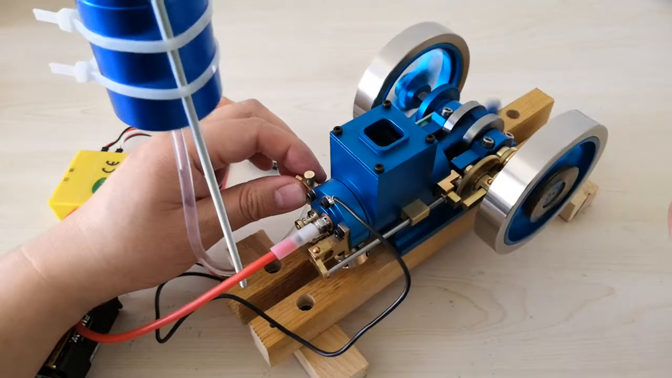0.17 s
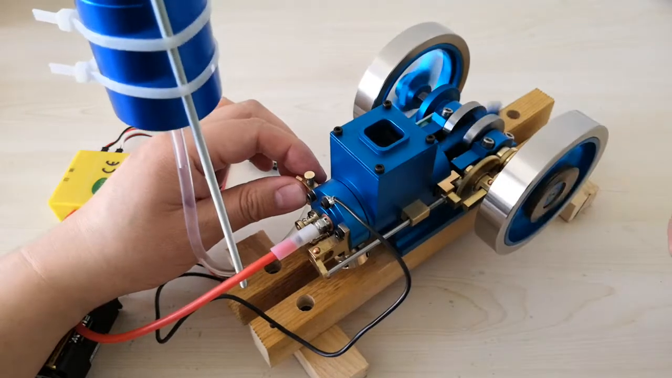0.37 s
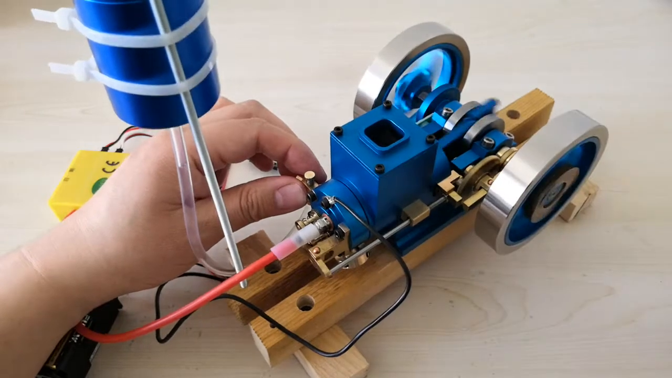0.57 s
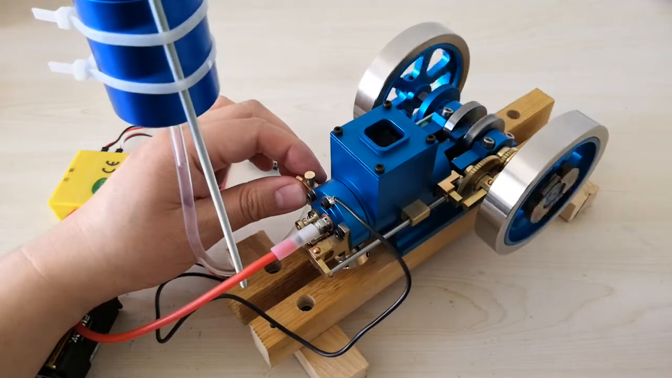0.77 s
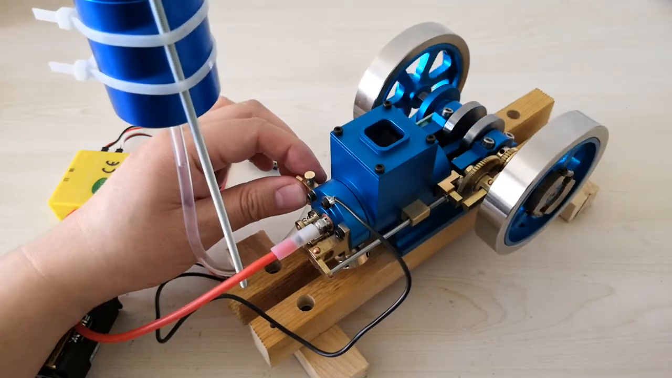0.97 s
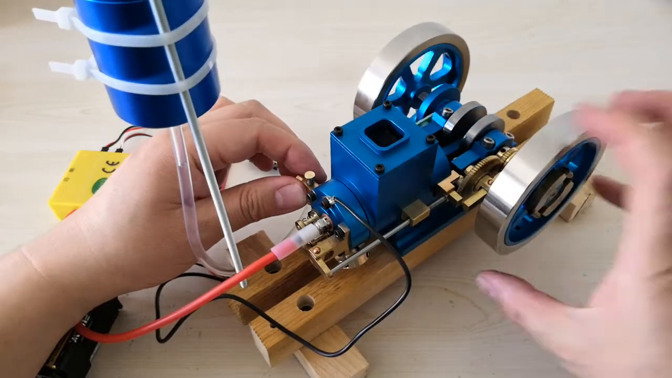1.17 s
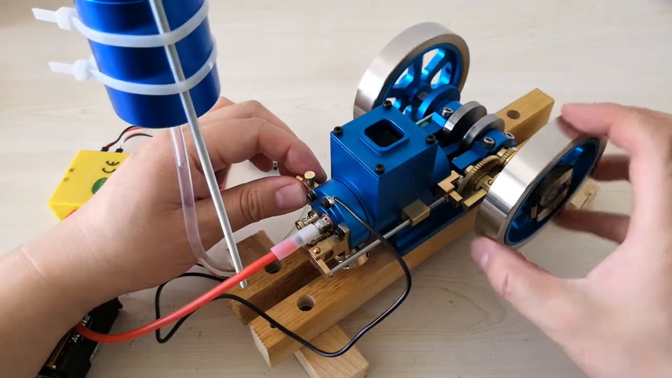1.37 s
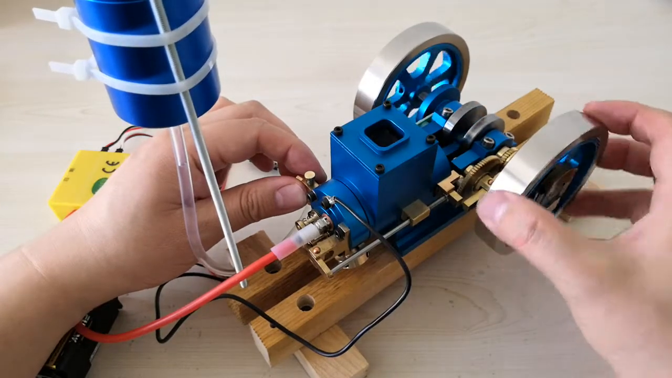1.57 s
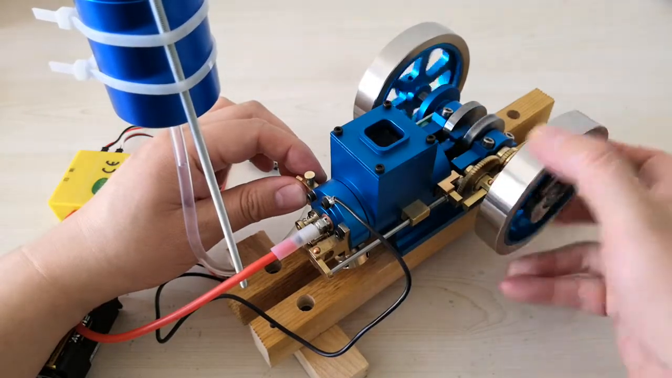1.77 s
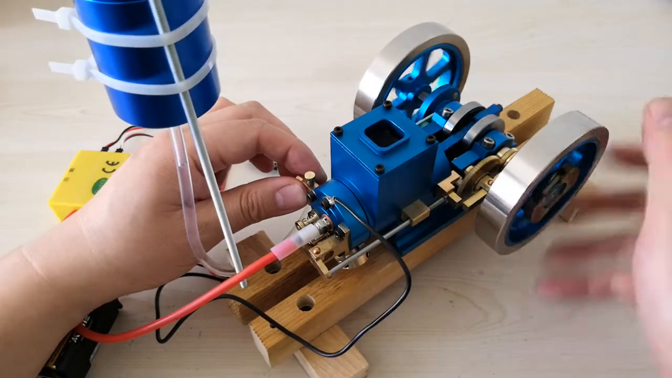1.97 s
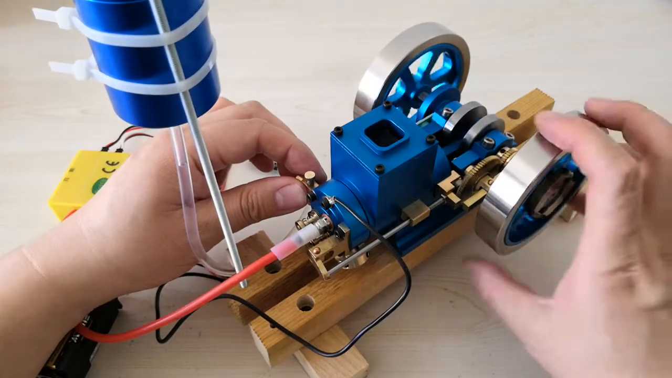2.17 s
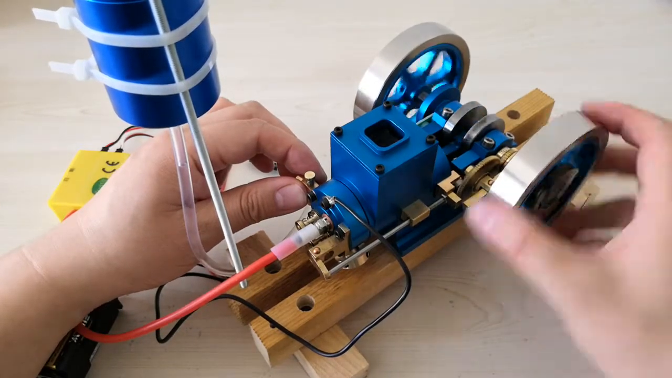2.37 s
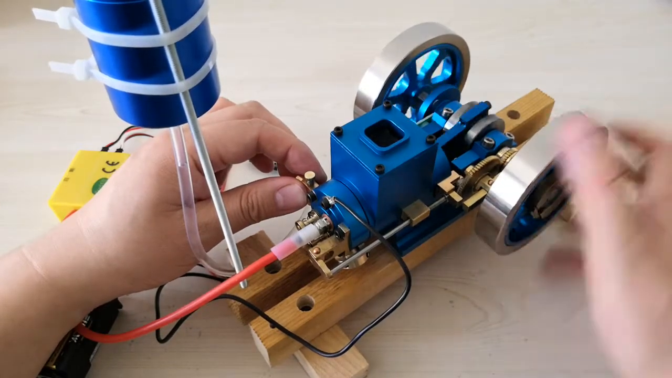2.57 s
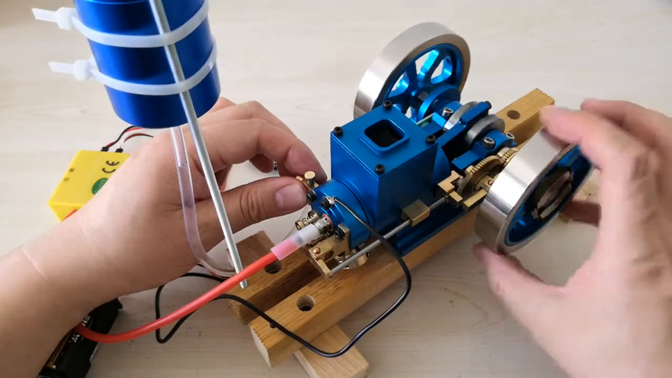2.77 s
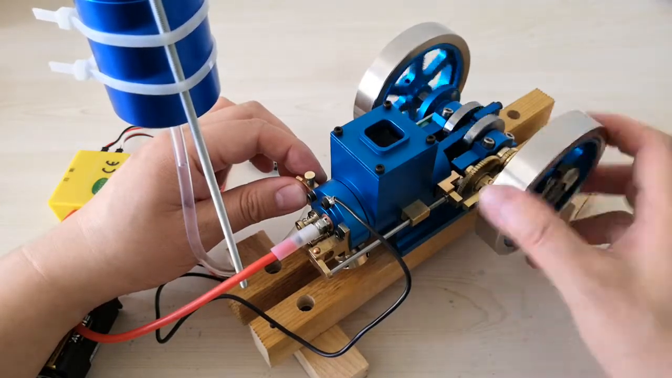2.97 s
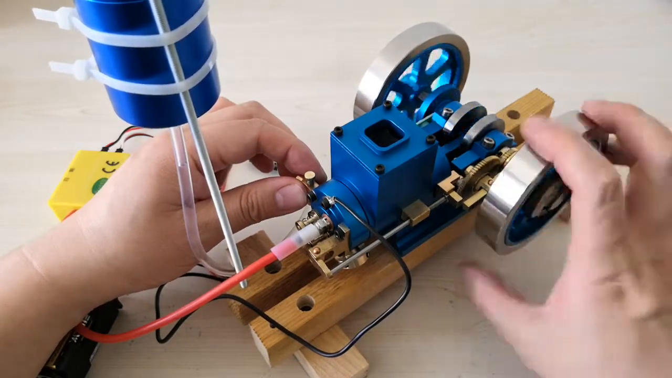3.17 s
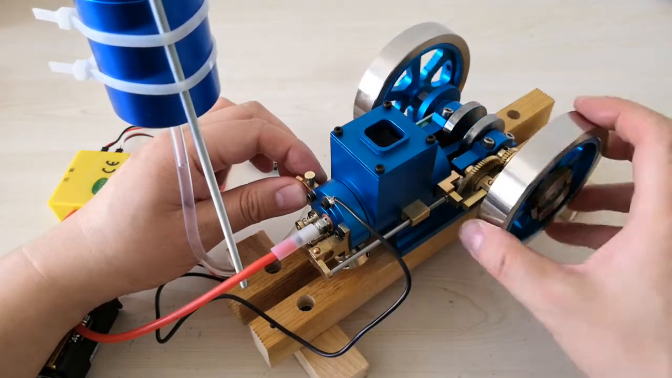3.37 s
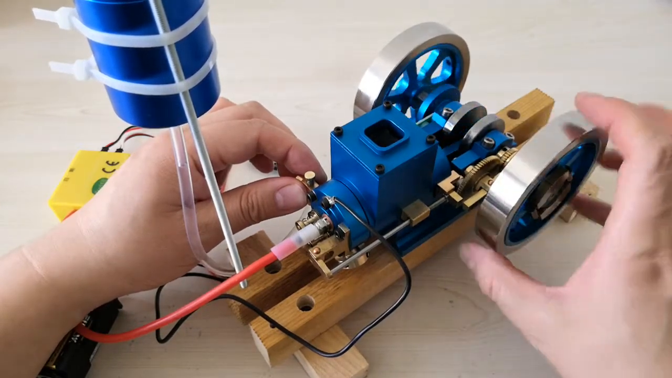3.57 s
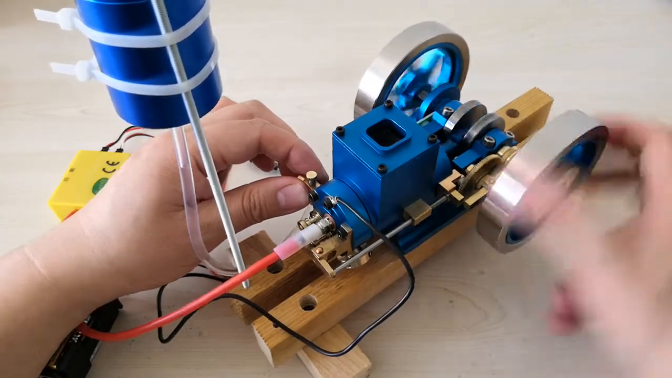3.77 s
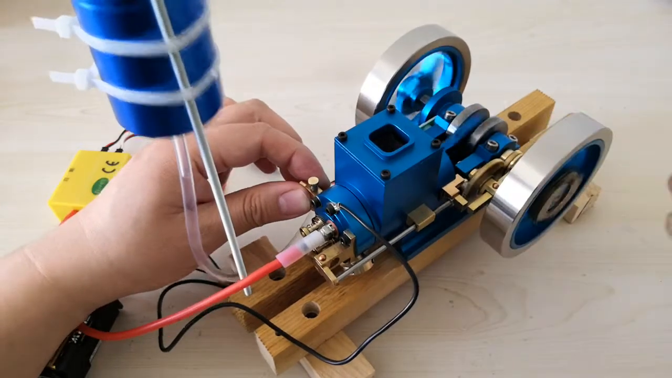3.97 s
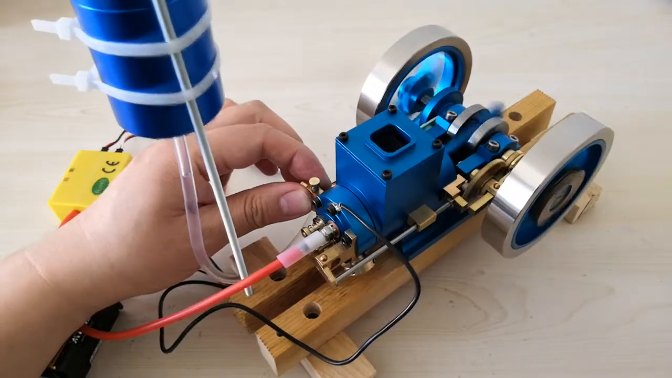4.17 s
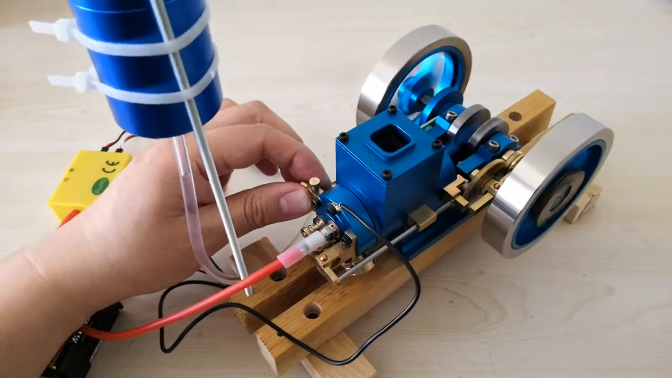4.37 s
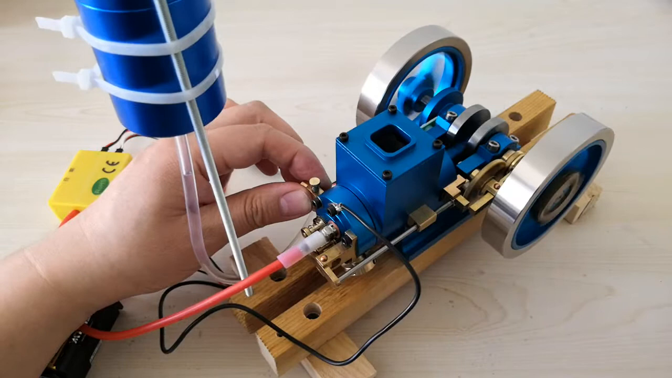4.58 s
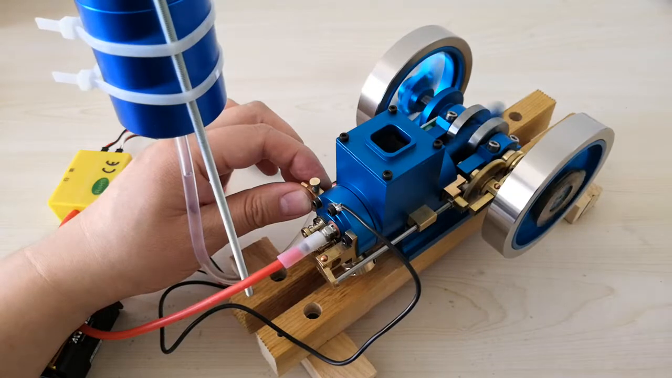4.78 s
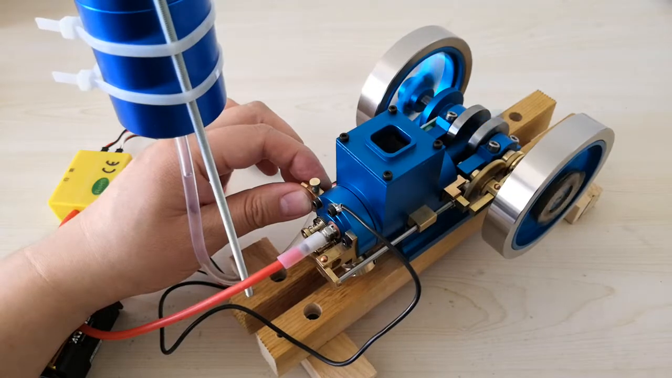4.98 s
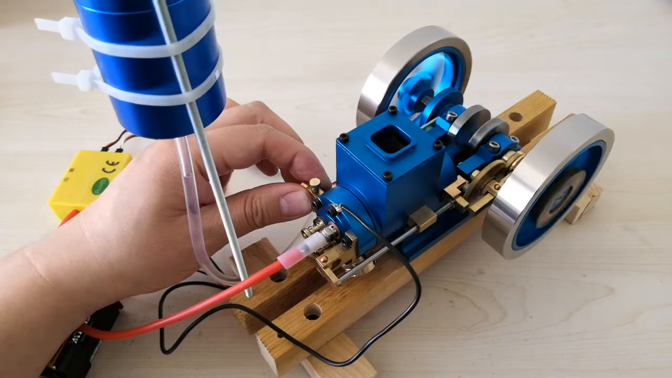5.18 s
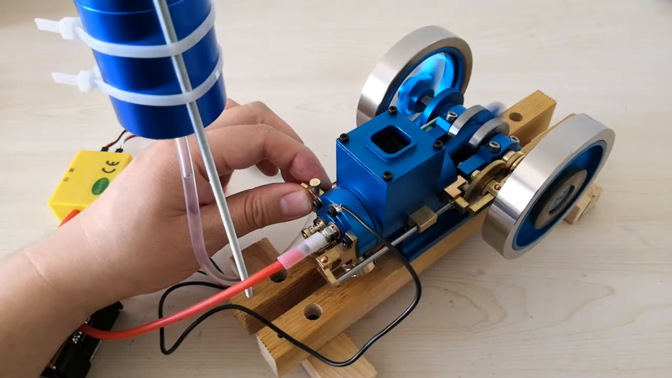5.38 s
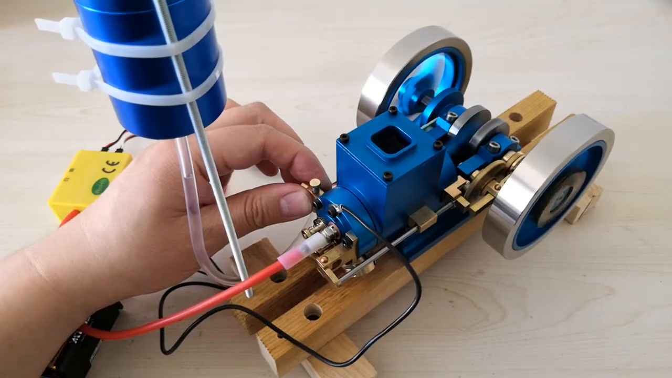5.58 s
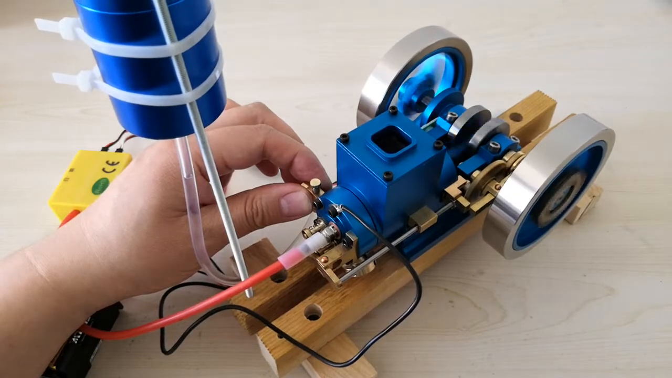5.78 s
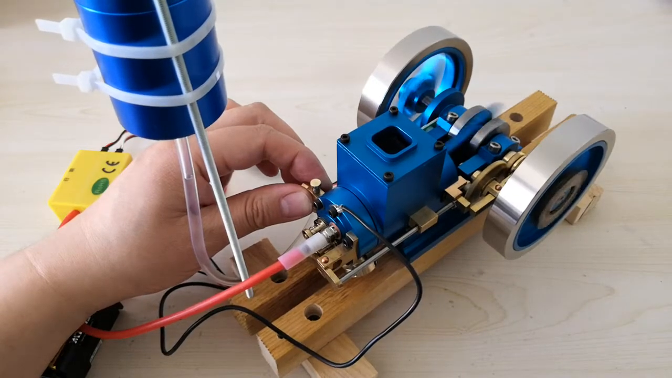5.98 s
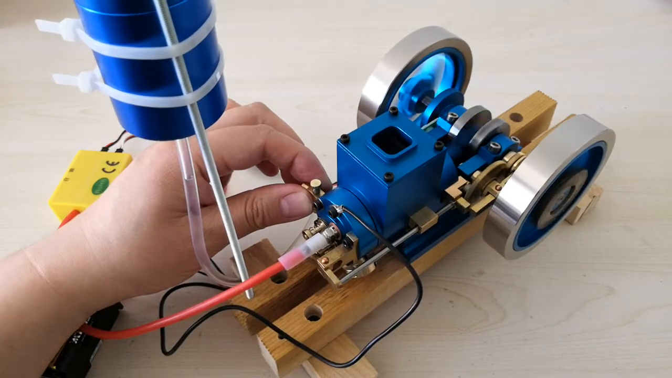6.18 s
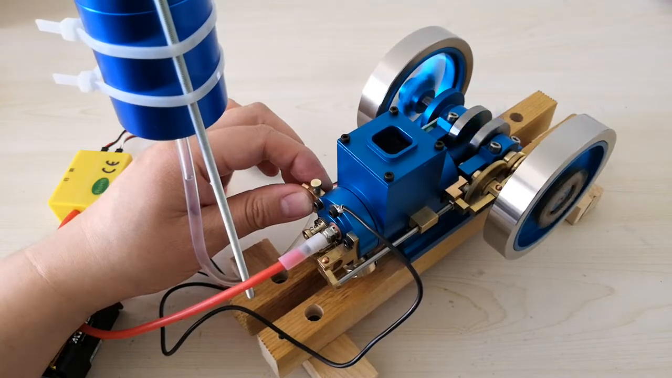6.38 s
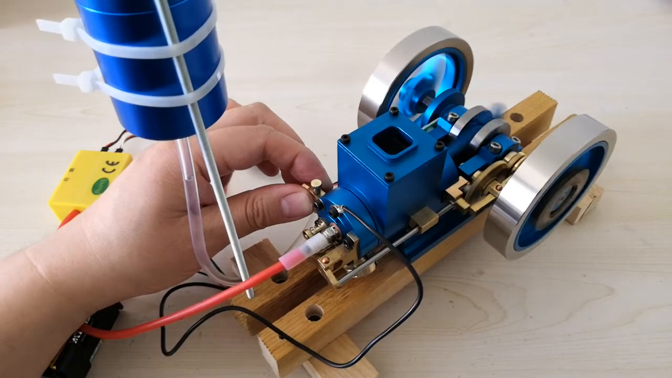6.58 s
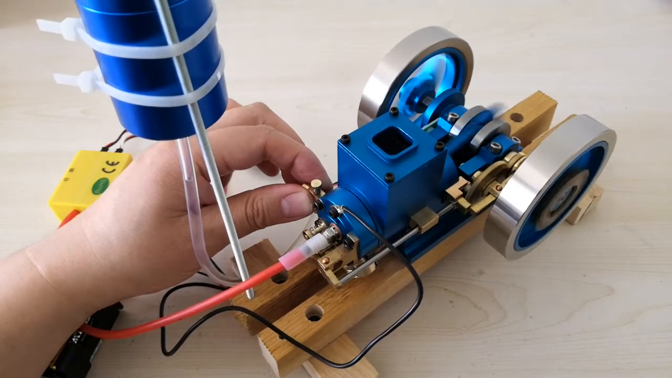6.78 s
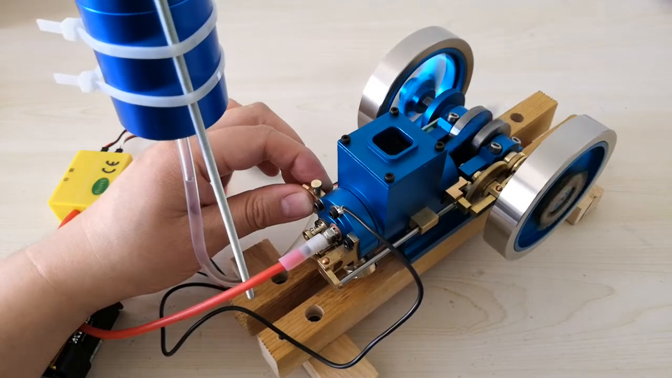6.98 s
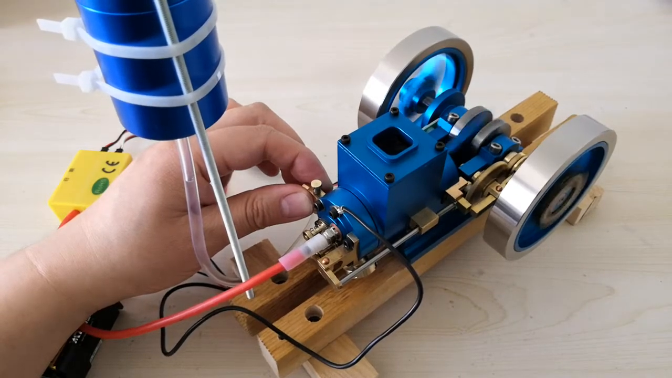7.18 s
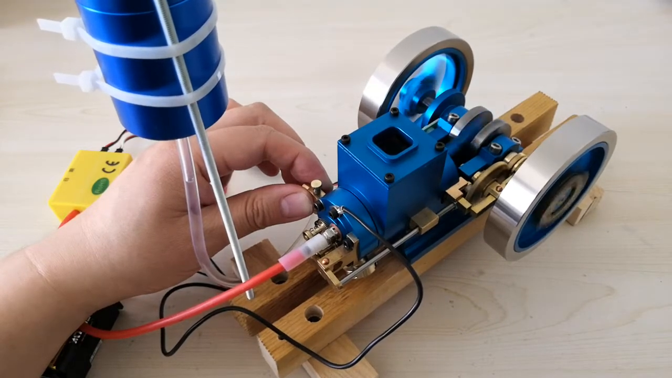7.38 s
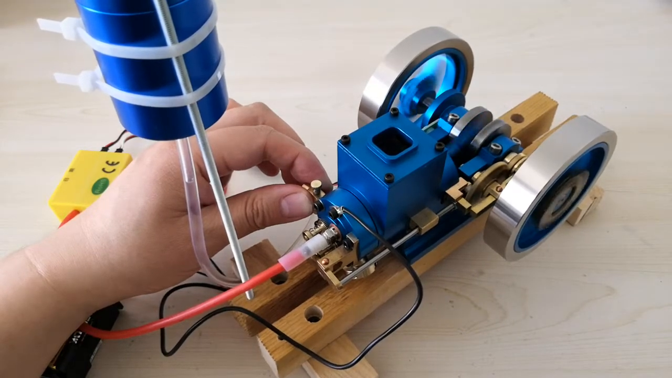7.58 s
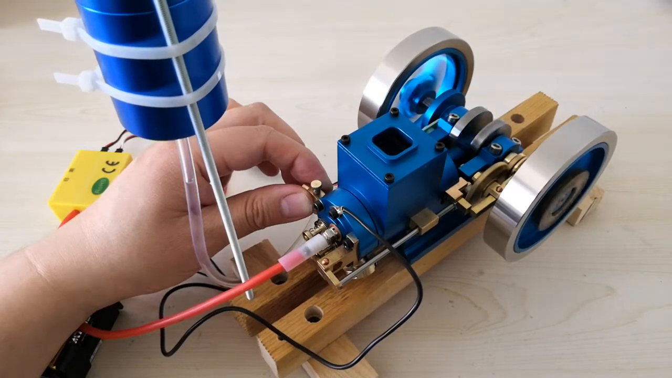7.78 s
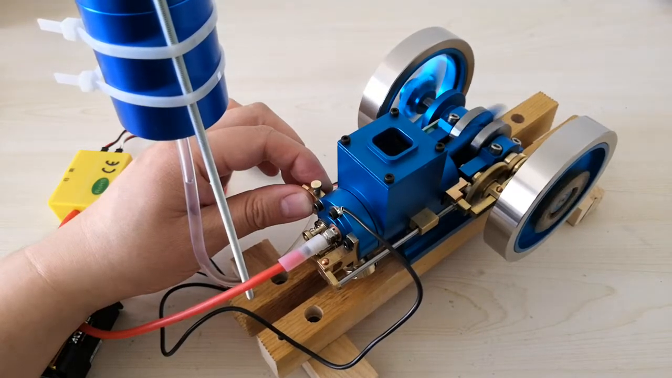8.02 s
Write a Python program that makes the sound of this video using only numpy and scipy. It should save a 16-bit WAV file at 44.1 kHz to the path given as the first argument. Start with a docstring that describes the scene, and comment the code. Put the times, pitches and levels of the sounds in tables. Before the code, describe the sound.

Hard steel knocks and gear chatter coast down within about a second, leaving faint finger bumps, small clicks and brief ratcheting turns in near silence. Then another flick, a thud of the base, and regular hissing spits with double knocks that accelerate over table rumble. Finally fast, dry pops take over, strongest on the right. Close stereo microphone, small bare room with slight ring.

```python
"""Model gas engine on a table

A small engine on a wooden table, close to a stereo microphone in a bare room. A flick gives a few
knocking turns that die out; it is turned by hand, flicked again and gathers speed. Each running cycle is
an exhaust spit (noise burst) and two knocks (frame modes) over whirring gears (tooth impulses in steel).
At last the spits harden to pops, gas slugs that overload the microphone input.
"""
import sys
import numpy as np
from scipy import signal
from scipy.fft import rfft, irfft, next_fast_len
from scipy.io import wavfile
from scipy.ndimage import uniform_filter1d, map_coordinates

SR = 44100
rng = np.random.default_rng(int(sys.argv[2]) if len(sys.argv) > 2 else 0)


def put_to_file(sound):
    """Save the sound as 16-bit audio at rate SR, in the file named by the first command-line argument."""
    columns = np.atleast_2d(sound).T  # one column per channel
    safe = np.clip(columns, -1, 1)
    whole_steps = np.round(safe * 32767)
    wavfile.write(sys.argv[1], SR, whole_steps.astype(np.int16))


N = 355005

# Table levels are relative: the layer gains come on top.
# crank knocks as the wheel is flicked or turned by hand:
# t/s, level/dB, length/s, time span over which softer knocks follow/s (0 = none follow)
CRANK_KNOCKS = [(0.081, -1.5, 0.0021, 0.2), (0.126, -6.5, 0.0018, 0), (0.1405, -13, 0.0034, 0.0017),
                (0.2718, -7, 0.0026, 0.19), (0.47, -7.5, 0.0021, 0.19), (0.6762, -8.5, 0.0019, 0.24),
                (0.686, -22, 0.0019, 0.00049), (0.9395, -19, 0.0027, 0.0068), (1.933, -15.5, 0.0058, 0),
                (1.94, -23, .004, 0.011), (3.934, -7, 0.0021, 0.17), (3.969, -16, 0.0038, 0)]
# softer knocks within such a span: share of span, level/dB, length/s
REBOUND_KNOCKS = [(0.31, -20.5, 0.0053), (0.543, -18.5, 0.0026)]
# frame modes rung by a knock: f/Hz, level/dB
FRAME_MODES = [(1500, -4), (1810, 8), (2200, -1.5), (2680, -6)]
# frame mode that sings on: f/Hz, width/Hz, level/dB
SINGING_MODE = [(1860, 7.5, -7)]
# dry steel contact spectrum: f/Hz, density/dB per Hz
STEEL_SPECTRUM = [(200, -12.5), (800, -2.5), (1100, -5.5), (1800, 6.5), (3700, -2), (4400, -9.5),
                  (5300, -2.5), (6300, -13.5), (7300, -7), (13000, -38)]
# exhaust rate from the first running stroke on: t/s, f/Hz (cycles)
CYCLE_RATE = [(4.115, 5.868), (4.3, 6.064), (5.05, 8.11), (5.45, 8.946), (5.7, 9.061)]
# strong exhaust strokes: t/s, bark/dB, hollow middle/dB, low thump/dB
POP_STROKES = [(6.3759, -12.5, -10.5, -16), (6.4813, -17, -16, -26), (6.5871, -16, -15.5, -20.5),
               (6.6916, -15, -12, -23), (6.7953, -11.5, -11.5, -9.5), (6.8998, -21, -38, -23.5),
               (7.004, -12, -7, -10.5), (7.1082, -16, -4.5, -16), (7.2101, -16.5, -7, -11.5),
               (7.3117, -11.5, -4, -13.5), (7.4141, -13, -12, -11), (7.5154, -12, -3.5, -9),
               (7.6159, -13, -44, -24), (7.7184, -13.5, -13.5, -13), (7.822, -12, -34, -25),
               (7.9269, -12.5, -14.5, -14), (8.0307, -16, -16, -29)]
# exhaust spectra, hiss and bark: f/Hz, density/dB per Hz
SPIT_SPECTRUM = [(1000, -93), (2400, 16.5), (4500, 10.5), (7500, 7), (12000, 0), (15500, -13)]
BARK_SPECTRUM = [(150, 7.5), (1000, -12.5), (1700, 13), (2500, 8.5), (7000, -7.5), (15000, -78)]
# hollow middle of a pop: f/Hz, density/dB per Hz
HOLLOW_SPECTRUM = [(450, -9.5), (1050, 14), (2200, -23)]
# wheel coasting after the first flick: t/s, table rumble/dB, gear whirr/dB
COAST_LEVELS = [(0.0, -49.5, -64.5), (0.07, -34, -28.5), (0.14, -29.5, -28), (0.25, -28, -28.5),
                (0.8, -32, -29), (0.91, -33, -40.5), (0.99, -28, -39), (1.12, -38.5, -50), (1.22, -51, -75)]
# last flick and the run: t/s, table rumble/dB, gear whirr/dB
RUN_LEVELS = [(3.851, -46, -54.5), (3.89, -36, -33.5), (3.99, -31, -23), (4.08, -29, -27),
              (5.2, -30.5, -27.5), (6.33, -40.5, -30), (6.42, -44, -33.5), (7.0, -39.5, -35),
              (8.041, -43, -35)]
# small turns by hand: t/s, hold/s, table rumble/dB, gear whirr/dB
HAND_TURNS = [(1.374, 0.057, -40, -55), (1.939, 0.094, -37, -37.5), (2.158, 0.028, -38, -54.5),
              (2.473, 0.078, -48, -44.5), (2.555, 0.032, -35, -36.5), (2.895, 0.095, -45, -55),
              (3.227, 0.084, -41.5, -76), (3.646, 0.014, -36, -45.5)]
# gear whirr spectrum: f/Hz, density/dB per Hz
WHIRR_SPECTRUM = [(200, -54), (400, -8), (620, -11.5), (800, -4), (1400, -4.5), (1850, 2.5), (2100, -8),
                  (2900, -1.5), (3700, -15.5), (6000, -14.5), (12000, -68.5)]
# resonances rung by the gear teeth: f/Hz, width/Hz, level/dB
GEAR_RESONANCES = [(2184, 110, -2.5), (3698, 120, -6)]
# piston and intake hiss: t/s, level against the whirr/dB
SLIDE_LEVELS = [(.85, 0.5), (1.1, -5), (2.3, -3), (2.55, 3), (2.9, -5), (4.1, -2.5), (5.2, 7.5), (7.5, 8)]
# piston and intake spectrum: f/Hz, density/dB per Hz
SLIDE_SPECTRUM = [(2500, -36), (4300, -2.5), (6100, -7.5), (7400, 0.5), (8500, -4.5), (10500, -10.5),
                  (15000, -21)]
# cam follower taps: share of cycle or span, level against the whirr/dB
CAM_TAPS = [(0.222, 4), (.69, 4)]
# scraping or ticking valve-gear links: f/Hz, density/dB per Hz
ROD_SPECTRUM = [(1500, -27), (2500, 5), (3600, 7.5), (5500, -5), (8000, -9), (15000, -56.5)]
# valve rod and catch clicks: t/s, level/dB, length/s
VALVE_CLICKS = [(0.644, -25, 0.0037), (0.839, -12, 0.0071), (1.363, -36, 0.015), (1.44, -25, 0.0033),
                (1.78, -50, 0.0092), (1.892, -42.5, 0.012), (1.931, -21, 0.01), (2.388, -44.5, .005),
                (2.469, -23, 0.0057), (2.562, -25.5, 0.027), (2.854, -44, 0.0055), (2.937, -42, 0.0065),
                (3.617, -28.5, 0.0064), (3.627, -28.5, 0.0072)]
# finger bumps on the flywheel: t/s, level/dB
FINGER_GRIPS = [(2.163, -39.5), (2.565, -37), (2.881, -42), (2.927, -48.5), (3.23, -52), (3.276, -56.5)]
# dull grip spectrum: f/Hz, density/dB per Hz
GRIP_SPECTRUM = [(150, -2), (700, 4), (2200, -7.5), (6000, -40)]
# shaft squeaks: t/s, length/s, f/Hz, level/dB
SHAFT_SQUEAKS = [(2.94, 0.17, 3320, -68)]
# modes of the base on the table top: f/Hz, width/Hz, level/dB
TABLE_MODES = [(69.1, 46, -11), (124, 18.2, 5.5), (189, 43, -2.5), (246.7, 9.2, 0.5), (282, 13, 2.5),
               (394, 110, -10)]
# base rocking as the hand flicks the wheel: t/s, level/dB
BASE_THUMPS = [(0.142, -22.5), (3.985, -23.5)]
# thud of the rocking base: f/Hz, density/dB per Hz
THUD_SPECTRUM = [(25, -20.5), (70, 2.0), (300, -9.5), (2500, -63.0)]
# left-right likeness of noise: f/Hz, coherence
STEREO_COHERENCE = [(250, 0.99), (500, -0.14), (1100, 0.34), (2000, 0.49), (4000, 0.051), (10000, -0.14)]
# room decay: f/Hz, t60/s
ROOM_T60 = [(100, 0.76), (260, 0.081), (1840, 0.53), (5000, 0.47), (12000, 0.029)]
# quiet air spectrum: f/Hz, density/dB per Hz
AIR_SPECTRUM = [(25, -17), (120, 5.5), (170, -19.5), (1800, -25), (15000, -50.5)]

# spit levels at full speed, growth per doubling of speed, random spread
SPIT_HISS_DB, SPIT_BARK_DB, SPIT_KNOCK_DB = -13.5, -22, -13
HISS_GROWTH_DB, BARK_GROWTH_DB, KNOCK_GROWTH_DB = 8.5, -6.5, 11.5
SPIT_SCATTER_DB, POP_HISS_DB = 1.6, -18.5
# under power the crank knocks less, and ever less
POWERED_KNOCK_DB, KNOCK_FADE_DB_PER_S = -20, 2
CLACK_PITCH_RATIO = 1.09  # second knock over first
TURN_RISE_DB_PER_S, WHIRR_FALL_DB_PER_S, RUMBLE_FALL_DB_PER_S = 888, 120, 118
TOP_HZ = 15600


def knocks(lead_s=0.001885, attack_s=0.00061, thud_db=4):
    """A knock rings frame modes and bumps the table; short, hard ones clack more broadly."""
    ring, blows, t = np.zeros((2, N)), np.zeros(N), np.arange(SR // 25) / SR
    hz, level_db = np.transpose(FRAME_MODES)[:, :, None]
    rows = knock_times()
    for s, db, length_s, pitch in rows:
        chance = rng.standard_normal((4, len(FRAME_MODES), 1))
        detuned_hz = hz * pitch * (1 + 0.022 * chance[0])
        phase = 2 * np.pi * detuned_hz * t + 0.35 * chance[2:]  # one phase set per channel
        purity = (abs(length_s) / 0.004) ** 0.8  # long knocks favour the strongest modes
        mode_gain = amp(level_db * purity + 2 * chance[1])
        modes = (mode_gain * np.sin(phase)).sum(1)
        shape = (1 - np.exp(-(t / attack_s) ** 2)) * np.exp(-(t / length_s) ** 1.85)
        add(ring, s - lead_s, amp(db + 4.0) * unit(modes) * shape)
        # a longer blow shoves the table harder
        add(blows, s - lead_s, amp(db + thud_db) * purity ** 2 * np.hanning(40))
    contact_env = swells(rows[:, 0], rows[:, 1] - 17, rise_s=0.0013, fall_s=0.007)
    contact = contact_env * coloured(noise(), STEEL_SPECTRUM)
    singing = filtered(ring, lambda f: resonances(SINGING_MODE, f))
    return ring + singing + contact + filtered(blows, table)


def knock_times():
    """Running, play is taken up twice a cycle, second as a shorter, higher clack: t/s, dB, length/s, pitch."""
    s, fired = strokes(), np.transpose(POP_STROKES)[0]
    weak_db = SPIT_KNOCK_DB + KNOCK_GROWTH_DB * weak_strokes()[1]
    powered_db = POWERED_KNOCK_DB - KNOCK_FADE_DB_PER_S * (fired - fired[0])
    db = np.append(weak_db, powered_db)
    cycle_s = np.append(np.diff(s), s[-1] - s[-2])
    first = s + 0.256 * cycle_s + 0.0034
    second = s + 0.51 * cycle_s + 0.0046
    clack_db = db + np.interp(s, [4.5, 6.4], [5, -1])
    length_s = 0.005 * np.exp(rng.normal(0, 0.1, len(s)))
    by_hand = [(at, level, ring_s, 1) for at, level, ring_s, _ in CRANK_KNOCKS]
    rebounds = [(at + share * span_s, level, ring_s, 1)
                for at, _, _, span_s in CRANK_KNOCKS if span_s > 0
                for share, level, ring_s in REBOUND_KNOCKS]
    knock_rows = np.c_[first, db, length_s, np.ones(len(s))]
    clack_rows = np.c_[second, clack_db, 0.45 * length_s, np.full(len(s), CLACK_PITCH_RATIO)]
    rows = np.vstack([by_hand, rebounds, knock_rows, clack_rows])
    return rows[rows[:, 0] < N / SR]


def spits():
    """Weak cycles leave the exhaust valve as a short hiss, sharper as the speed grows."""
    s, speed = weak_strokes()
    chance_db = SPIT_SCATTER_DB * rng.standard_normal((len(s), 2))
    hiss_db = SPIT_HISS_DB + HISS_GROWTH_DB * speed + chance_db[:, 0]
    bark_db = SPIT_BARK_DB + BARK_GROWTH_DB * speed + chance_db[:, 1]
    hiss = swells(s, hiss_db, rise_s=0.0027, fall_s=0.0032) * coloured(noise(), SPIT_SPECTRUM)
    bark = swells(s, bark_db, rise_s=0.0049, fall_s=0.0036) * coloured(noise(), BARK_SPECTRUM)
    return hiss + bark + gas_push(s + 0.00082, hiss_db - 7.0, rise_s=0.0014, stop_s=0.001)


def pops(jet_lag_s=0.000559):
    """Strong cycles pop and suck air back; the jet strikes the right microphone port first and hardest."""
    s, bark_db, middle_db, thump_db = np.transpose(POP_STROKES)
    bark_noise = levelled(coloured(rng.standard_normal(N), BARK_SPECTRUM))
    bark = swells(s, bark_db + 9.0, rise_s=0.0013, fall_s=0.00078) * bark_noise
    hollow_noise = levelled(coloured(rng.standard_normal(N), HOLLOW_SPECTRUM))
    hollow = swells(s, middle_db, rise_s=0.00047, fall_s=0.0006) * hollow_noise
    hiss_env = swells(s, np.full(len(s), POP_HISS_DB), rise_s=0.0015, fall_s=0.0025)
    pop = bark + hollow + hiss_env * coloured(noise(), SPIT_SPECTRUM)
    left = filtered(pop[0], lambda hz: amp(-13.5) * np.exp(-2j * np.pi * hz * jet_lag_s))
    right = amp(1) * pop[1]
    push = gas_push(s - 0.0002, thump_db - 5.5, rise_s=0.0012, stop_s=0.0012)
    suction = strikes(s + 0.00069, thump_db + 1, decay_s=0.0023)
    return np.array([left, right]) + push - suction


def gas_push(times, levels_db, rise_s, stop_s):
    """A slug of gas builds pressure, stops short and leaves a suction behind (two high-passes)."""
    slug = swells(times, levels_db, rise_s, stop_s)
    return filtered(slug, lambda hz: 1j * hz / (1j * hz + 75) * 1j * hz / (1j * hz + 12))


def weak_strokes(count=18):
    """One exhaust stroke a cycle until the engine catches: t/s, speed in doublings from full speed."""
    s, rate_hz = np.transpose(CYCLE_RATE)
    times = [s[0]]
    while len(times) < count:
        times.append(times[-1] + 1 / np.interp(times[-1], s, rate_hz))
    return np.array(times), np.log2(np.interp(times, s, rate_hz) / rate_hz[-1])


def strokes():
    """Times of all exhaust strokes, weak and strong."""
    return np.append(weak_strokes()[0], np.transpose(POP_STROKES)[0])


def cycle_times(share):
    """The moment at a given share of every span after a hand-driven knock and of every running cycle."""
    s = strokes()
    by_hand = [at + share * span_s for at, _, _, span_s in CRANK_KNOCKS if span_s > 0]
    return np.append(by_hand, s[:-1] + share * np.diff(s))


def running_gear(tooth_rate_hz=700, tooth_db=5, tooth_t60_s=0.022, flutter_db=2.0, ring_db=-7, slack_db=-1.0):
    """Gear teeth chatter in many small steel resonances while the piston slides."""
    t = np.arange(N) / SR
    slack = cycle_times(0.12)  # gears run slack early in each cycle or span
    lull_db = swells(slack, np.zeros(len(slack)), rise_s=0.014, fall_s=0.01) * slack_db
    whirr = amp(gear_levels(t)[1] + lull_db + flutter_db * wobble(70))
    slide = whirr * amp(np.interp(t, *np.transpose(SLIDE_LEVELS)))
    teeth = (rng.random(N) < tooth_rate_hz / SR) * rng.standard_normal(N)
    steel = rng.standard_normal((2, SR // 8)) * amp(-60 * t[:SR // 8] / tooth_t60_s)
    rung_teeth = signal.fftconvolve(teeth[None], steel, axes=1)[:, :N]
    chatter = noise() + amp(tooth_db) * unit(spread(rung_teeth))
    ring = unit(filtered(noise(), lambda hz: resonances(GEAR_RESONANCES, hz)))
    gears = whirr * (amp(-2.5) * coloured(chatter, WHIRR_SPECTRUM) + amp(ring_db) * ring)
    return gears + slide * amp(-15.5) * coloured(chatter, SLIDE_SPECTRUM)


def gear_levels(t):
    """Table rumble and whirr in dB: the wheel spins freely, or a hand turn starts, holds and dies away."""
    fall = np.array([[RUMBLE_FALL_DB_PER_S], [WHIRR_FALL_DB_PER_S]])

    def outside_db(start, end):
        return TURN_RISE_DB_PER_S * np.maximum(start - t, 0) + fall * np.maximum(t - end, 0)

    levels = [np.array([[rumble], [whirr]]) - outside_db(s, s + hold)
              for s, hold, rumble, whirr in HAND_TURNS]
    for s, rumble, whirr in (np.transpose(COAST_LEVELS), np.transpose(RUN_LEVELS)):
        spin = np.array([np.interp(t, s, rumble), np.interp(t, s, whirr)])
        levels.append(spin - outside_db(s[0], s[-1]))
    return np.max(levels, axis=0)


def cam_ticks():
    """The follower taps the cam twice a cycle or span, as hard as the gears run."""
    taps = np.zeros(N)
    for share, db in CAM_TAPS:
        when = cycle_times(share)
        scatter_db = rng.normal(0, 1.5, len(when))
        taps += strikes(when, gear_levels(when)[1] + db + scatter_db, decay_s=0.0042)
    return taps * coloured(noise(), ROD_SPECTRUM)


def valve_rod(cycle_share=0.853, rod_db=-2.5):
    """The rod scrapes as the cam lifts it, as hard as the gears run."""
    lift = cycle_times(cycle_share)
    level_db = gear_levels(lift)[1] + rod_db + 1.5 * rng.standard_normal(len(lift))
    scrape = swells(lift, level_db, rise_s=0.011, fall_s=0.017) * amp(3.6 * wobble(300))
    return scrape * coloured(noise(), ROD_SPECTRUM)


def loose_parts(rattle_rate_hz=28):
    """Air is sucked in between the knocks; loose links tick at random, as hard as the gears run."""
    intake = cycle_times(0.32)
    suck_env = swells(intake, gear_levels(intake)[1] - 4, rise_s=0.0099, fall_s=0.025)
    suck = suck_env * coloured(noise(), SLIDE_SPECTRUM)
    when = np.flatnonzero(rng.random(N) < rattle_rate_hz / SR) / SR
    tick_db = gear_levels(when)[1] - 3.5 + 2 * rng.standard_normal(len(when))
    return suck + strikes(when, tick_db, decay_s=0.0015) * coloured(noise(), ROD_SPECTRUM)


def clicks():
    """Light, dry steel contacts in the valve gear snap sharply and die away."""
    contacts = sum(strikes([s], [db - 6.5], decay_s=length_s) for s, db, length_s in VALVE_CLICKS)
    return contacts * coloured(noise(), STEEL_SPECTRUM)


def handling():
    """Fingers bump the wheel (dull noise) and the eased shaft squeaks (unsteady sine)."""
    grip_env = swells(*np.transpose(FINGER_GRIPS), rise_s=0.0012, fall_s=0.0095)
    sound = grip_env * coloured(noise(), GRIP_SPECTRUM)
    for s, length_s, squeak_hz, db in SHAFT_SQUEAKS:
        n = int(length_s * SR)
        hz = squeak_hz * (1 + 0.0063 * wobble(150)[:n])
        add(sound, s, amp(db) * np.hanning(n) * np.sin(2 * np.pi * np.cumsum(hz) / SR))
    return sound


def table_top(boom_hz=113.1, wander_rad=0.61):
    """The shaken table rumbles in its modes, booms at one low pitch and thuds as the base rocks."""
    t = np.arange(N) / SR
    lumps = amp(2.5 * wobble(24))
    boom = lumps * np.sin(2 * np.pi * boom_hz * t + wander_rad * wobble(9.8))
    shaken = unit(filtered(noise(), table))
    rumble = amp(gear_levels(t)[0]) * (amp(-2.5) * boom + amp(-7.5) * shaken)
    thud = coloured(noise(), THUD_SPECTRUM)
    return rumble + swells(*np.transpose(BASE_THUMPS), rise_s=0.016, fall_s=0.03) * thud


def table(hz):
    """Response of the wooden base and table top."""
    return resonances(TABLE_MODES, hz)


def room(x, echo_s=0.0105, echo_db=-12, tail_db=-9):
    """One near surface answers first, then the room rings out as decaying noise."""
    hz, t, z = signal.stft(rng.standard_normal((2, SR * 2 // 3)), SR, nperseg=256)
    decay = amp(-60 * t / along(ROOM_T60, hz)[:, None])
    tail = signal.istft(z * decay, SR, nperseg=256)[1]
    late = signal.fftconvolve(x, tail / np.linalg.norm(tail[0]), axes=1)[:, :N]
    return filtered(amp(echo_db) * x + amp(tail_db) * late, lambda f: np.exp(-2j * np.pi * f * echo_s))


def quiet_air():
    """Steady, mostly low noise under everything."""
    return amp(-58.0) * coloured(noise(), AIR_SPECTRUM)


def amp(db):
    """Decibels to gain."""
    return 10 ** (np.asarray(db) / 20)


def unit(x):
    """Scale to rms 1."""
    return x / np.sqrt(np.mean(x ** 2) + 1e-20)


def along(points, hz):
    """(f/Hz, value) points read on a log axis."""
    f, v = np.transpose(points)
    return np.interp(np.log(hz + 1), np.log(f + 1), v)


def wobble(rate_hz):
    """A smooth random curve, rate_hz knots a second."""
    knots = rng.standard_normal(int(N * rate_hz / SR) + 4)
    return map_coordinates(knots, [np.arange(N) * rate_hz / SR])


def filtered(x, response):
    """x times a complex response of frequency."""
    m = next_fast_len(N + SR // 2)
    return irfft(rfft(x, m) * response(np.fft.rfftfreq(m, 1 / SR)), m)[..., :N]


def coloured(x, spectrum):
    """x shaped by the given spectrum, at rms 1."""
    return unit(filtered(x, lambda hz: amp(along(spectrum, hz))))


def levelled(x):
    """Noise with its chance swells evened out, so that a brief burst has a set strength."""
    return x / np.sqrt(np.abs(uniform_filter1d(x ** 2, SR // 400)) + 1e-9)


def resonances(modes, hz):
    """Sum of (f/Hz, width/Hz, level/dB) resonances with alternating signs."""
    return sum((-1) ** k * amp(db) * 1j * hz * w / (c * c - hz * hz + 1j * hz * w)
               for k, (c, w, db) in enumerate(modes))


def spread(pair):
    """Two unrelated signals become left and right, alike in the bass."""
    def turn(hz):
        return np.arccos(np.clip(along(STEREO_COHERENCE, hz), -1, 1)) / 2

    mid, side = filtered(pair, lambda hz: np.array([np.cos(turn(hz)), np.sin(turn(hz))]))
    return np.array([mid + side, mid - side])


def noise():
    """Stereo noise from white sources."""
    return spread(rng.standard_normal((2, N)))


def add(track, s, sound):
    """Mix a sound into a track at time s."""
    i = int(np.clip(round(s * SR), 0, N - 1))
    track[..., i:i + sound.shape[-1]] += sound[..., :N - i]


def swells(times, levels_db, rise_s, fall_s):
    """An envelope with one quick swell peaking at each time."""
    env, t = np.zeros(N), np.arange(-SR // 12, SR // 4) / SR
    shape = np.exp(-np.where(t < 0, (t / rise_s) ** 2, np.abs(t / fall_s) ** 1.2))
    for s, db in zip(times, levels_db):
        add(env, s + t[0], amp(db) * shape)
    return env


def strikes(times, levels_db, decay_s, attack_s=0.00038):
    """An envelope that jumps up at each time and then dies away."""
    env, t = np.zeros(N), np.arange(SR // 8) / SR
    shape = (1 - np.exp(-(t / attack_s) ** 2)) * np.exp(-t / decay_s)
    for s, db in zip(times, levels_db):
        add(env, s, amp(db) * shape)
    return env


def scene():
    """The engine, its room and the quiet air around it."""
    near = knocks() + clicks() + handling() + spits()
    exhaust = pops()
    gear = running_gear() + cam_ticks() + valve_rod() + loose_parts()
    echoes = room(near + amp(-48) * exhaust)
    return near + exhaust + echoes + gear + table_top() + quiet_air()


def record(dry, threshold_db=-13, recovery_s=0.051, reaction_s=0.0038, ceiling=1.0, low_cut_hz=6):
    """Gain control ducks just after loud peaks and recovers; soft clipping and band limits follow."""
    power = np.abs(uniform_filter1d(np.max(dry ** 2, axis=0), SR // 400))
    fading = np.arange(N) / SR / recovery_s
    held = np.exp(np.maximum.accumulate(np.log(power + 1e-12) + fading) - fading)
    held = np.interp(np.arange(N) - reaction_s * SR, np.arange(N), held)
    ducked = dry / (1 + (held / amp(threshold_db + 3.5) ** 2) ** 2) ** 0.3
    clipped = ducked / (1 + np.abs(ducked / ceiling) ** 6) ** (1 / 6)
    return filtered(clipped, lambda hz: 1j * hz / (1j * hz + low_cut_hz) / (1 + (hz / TOP_HZ) ** 80))


dry = scene()
out = record(dry)
put_to_file(out)
```